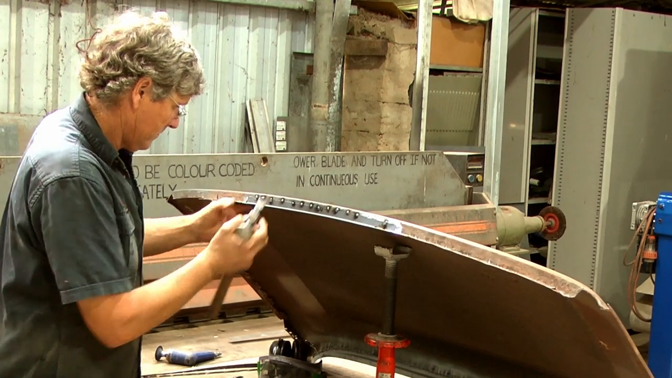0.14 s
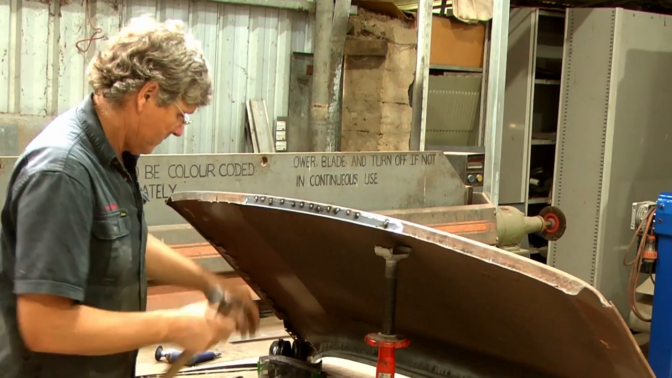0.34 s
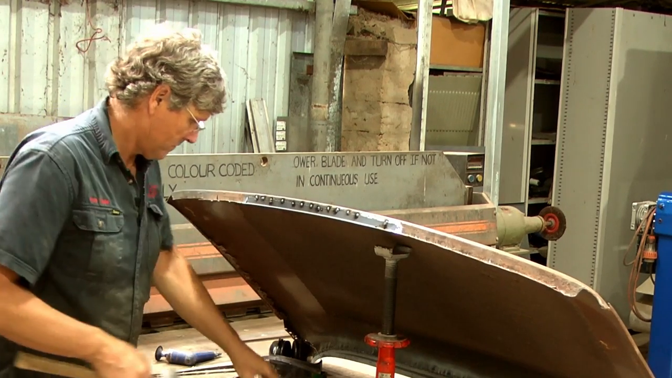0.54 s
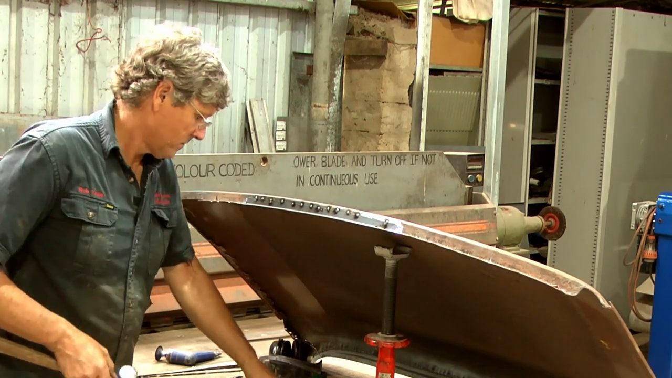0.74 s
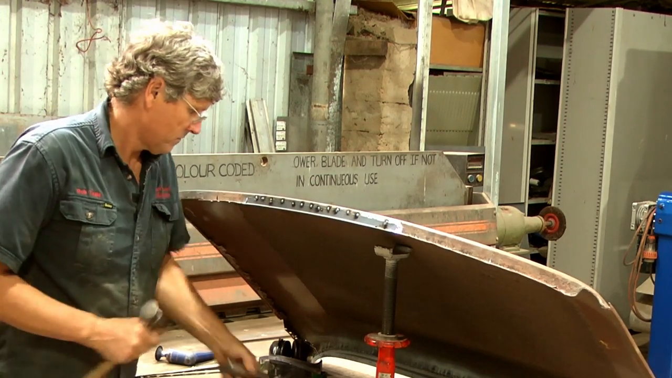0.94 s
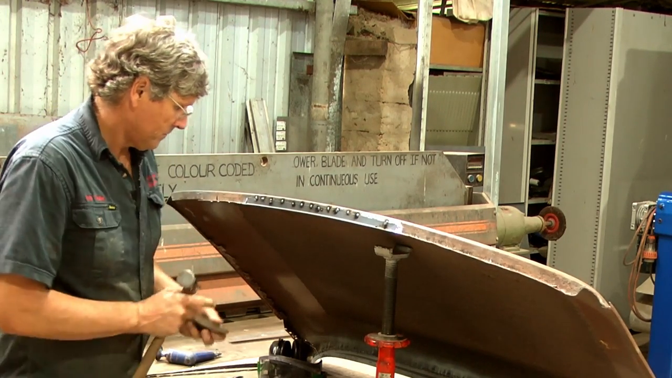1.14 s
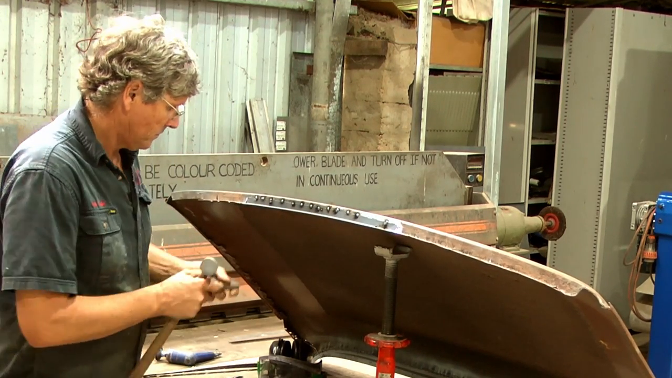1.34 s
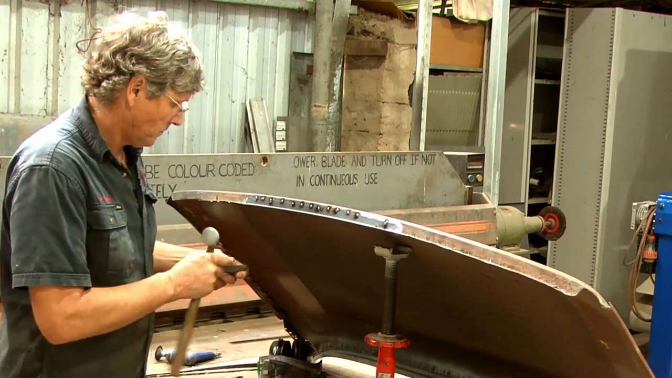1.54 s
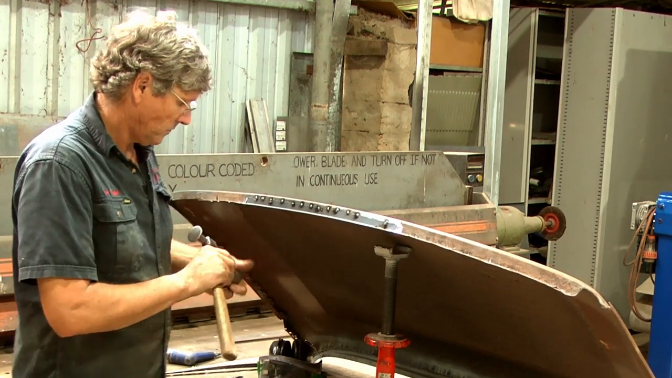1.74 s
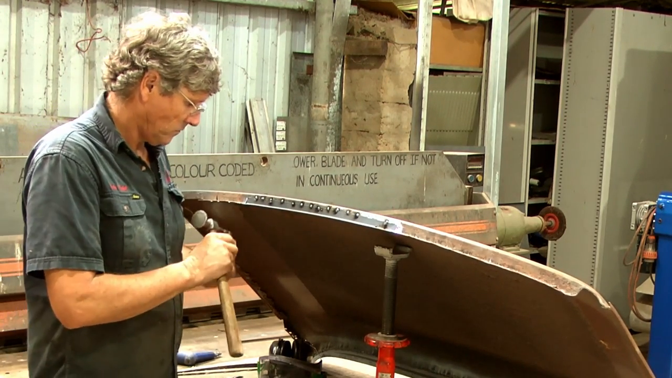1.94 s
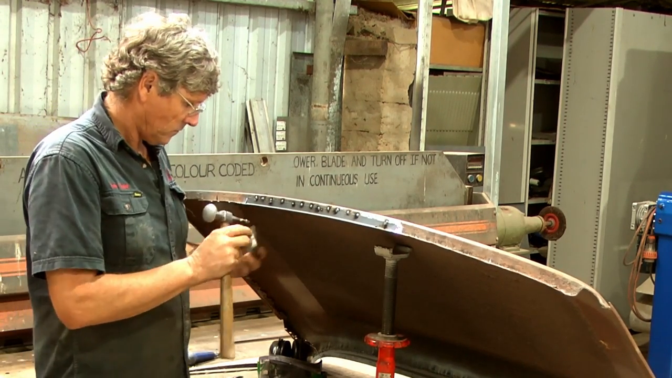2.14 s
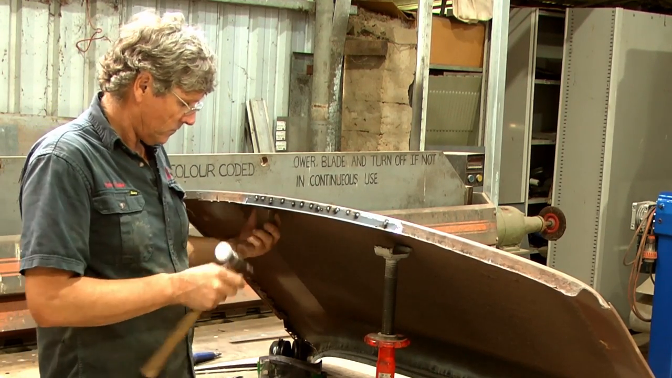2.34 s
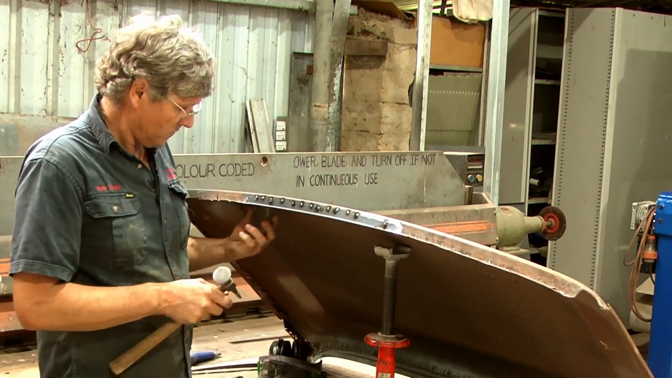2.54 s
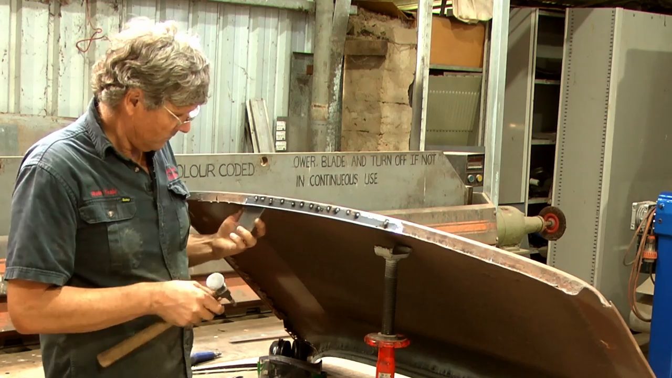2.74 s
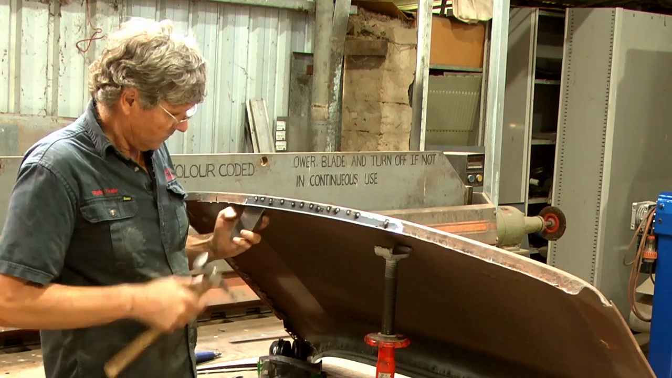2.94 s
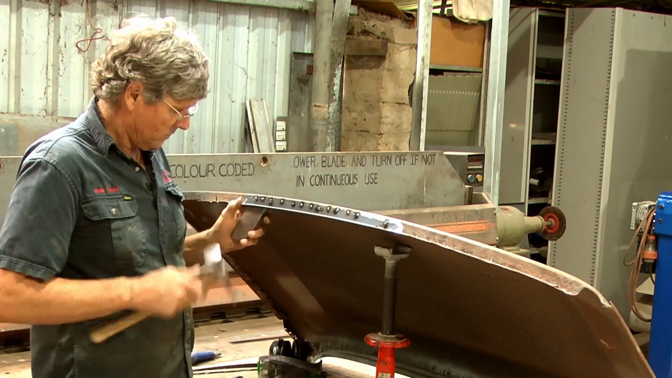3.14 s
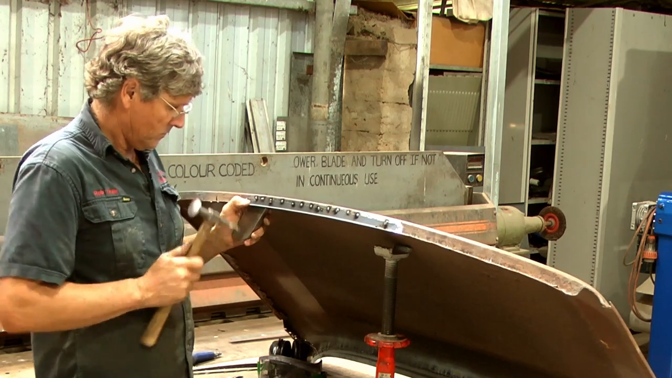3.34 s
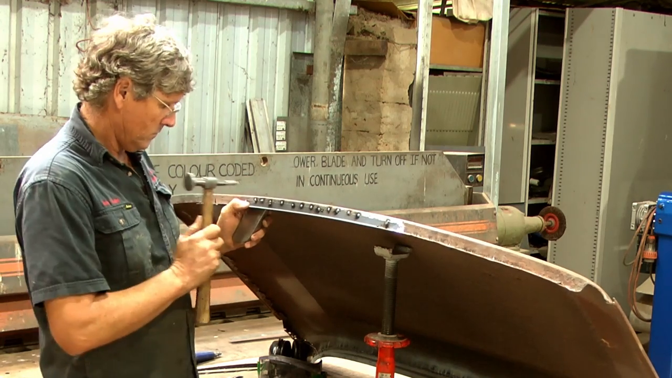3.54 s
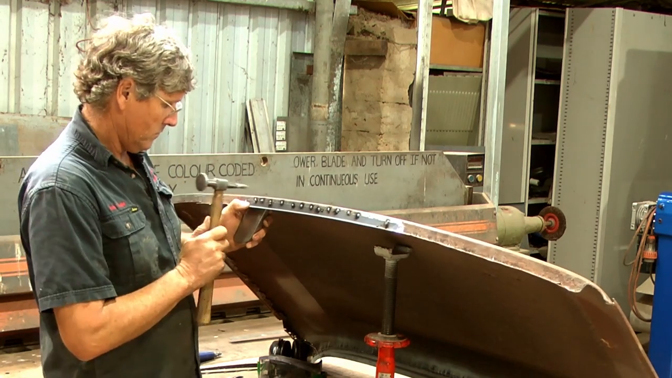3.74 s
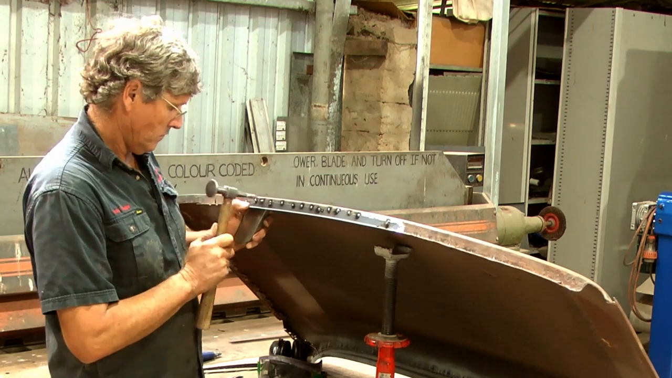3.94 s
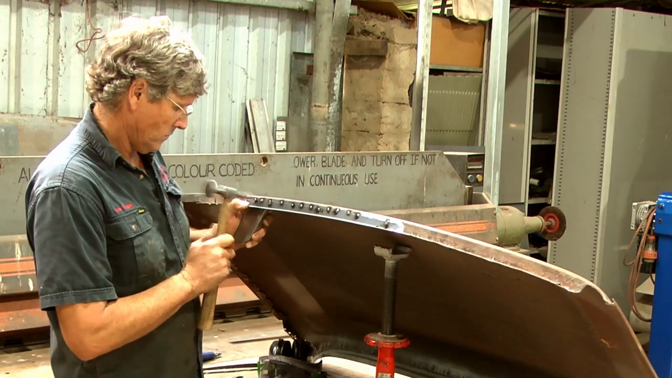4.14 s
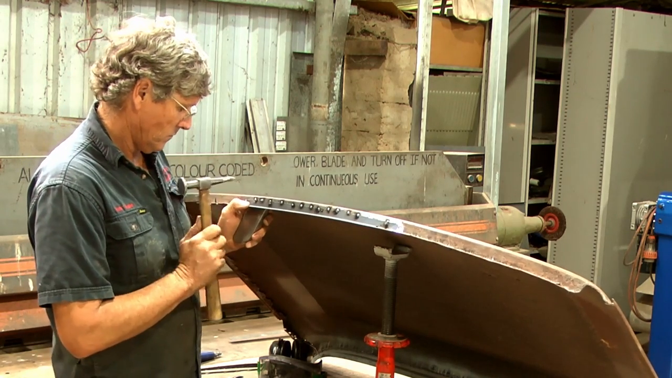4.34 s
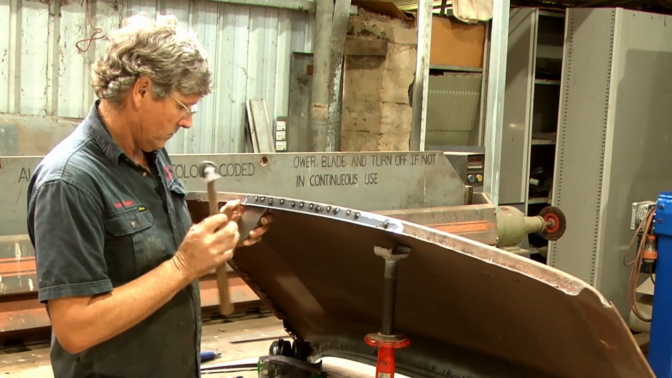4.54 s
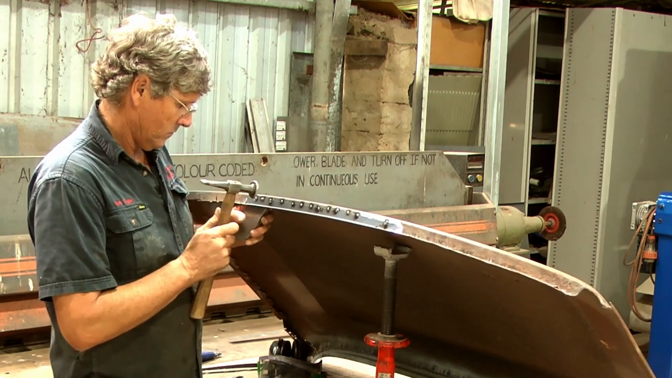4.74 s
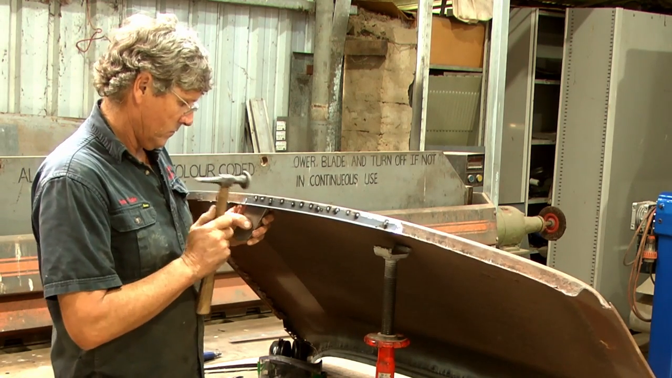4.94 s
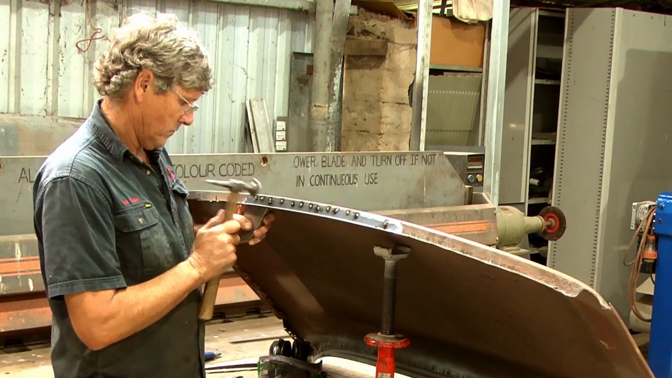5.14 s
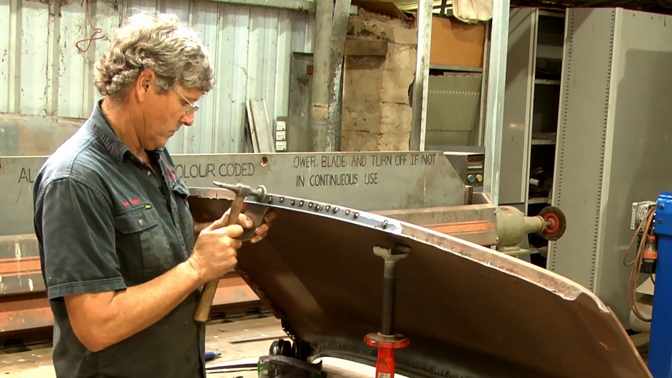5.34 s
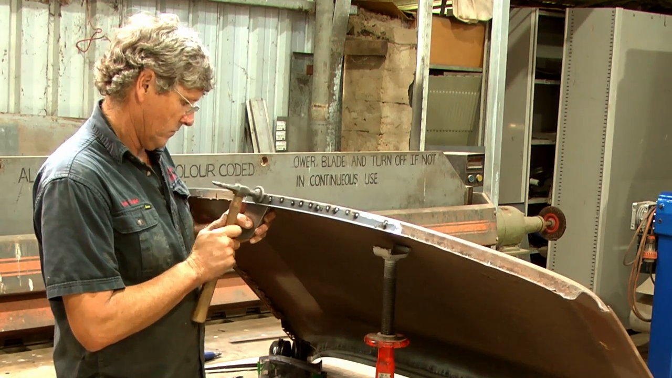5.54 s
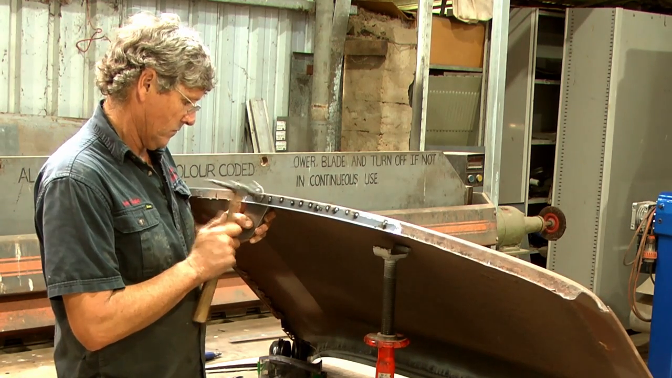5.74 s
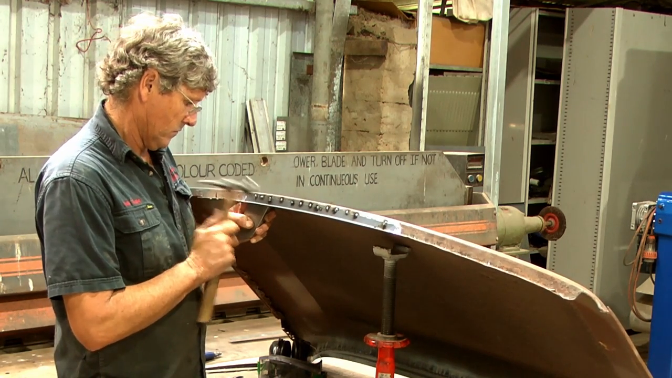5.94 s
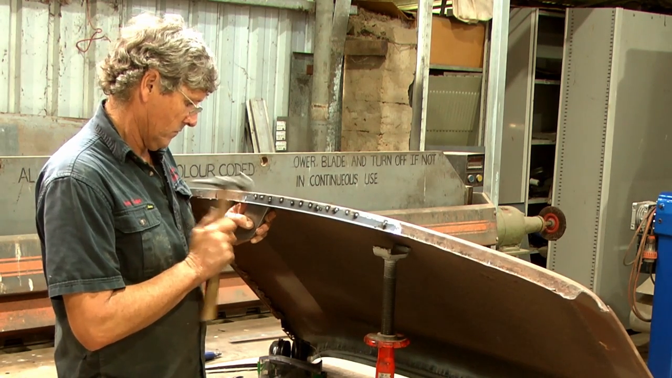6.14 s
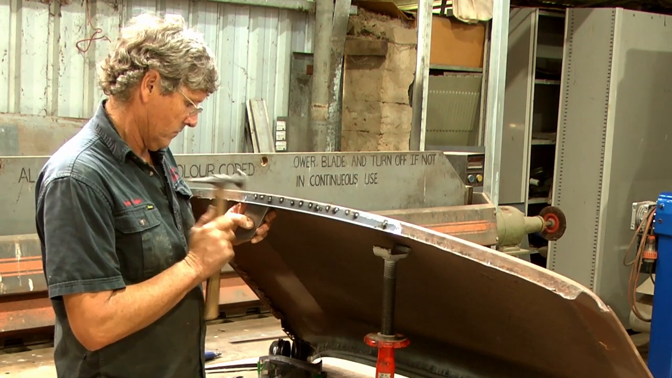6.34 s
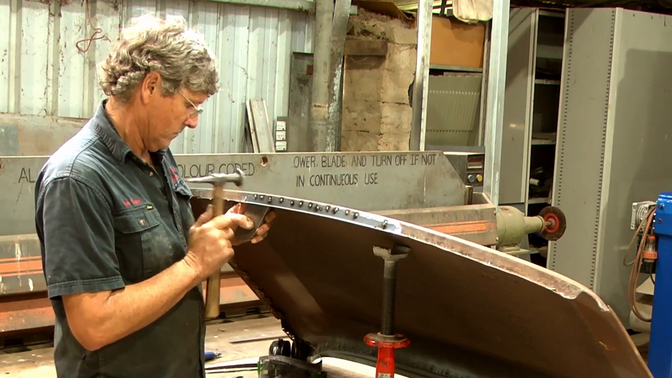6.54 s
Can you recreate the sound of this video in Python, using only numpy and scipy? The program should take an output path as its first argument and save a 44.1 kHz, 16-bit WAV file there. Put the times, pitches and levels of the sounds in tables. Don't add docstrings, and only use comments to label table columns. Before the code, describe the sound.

A distant machine hums faintly throughout, with wavering tones and thin whines beneath soft air noise in a tin-walled shed. From 0 to 2.3 s, hands and cloth rub grainily over tools, with soft low thuds around 0.3, 0.7 and 1.1 s and barely audible steel tinks. At 2.4 s a heavy steel block knocks hollowly on sheet steel, then catches and clatters brightly at 2.7 to 2.9 s. Rustling and a longer dragging rumble follow, ending around 3.3 s with a small squeak and bump. Hammering starts at 4.0 s with a dull, heavy blow, another at 4.2 s, then the ring fades. From 5.15 to 6.65 s eight hard blows come about every 0.2 s: sharp cracks, short damped clanging panel tones and shed reverberation. Brightness varies; the sixth overall is brightest, the last two ring at the hammer face. The close microphone overloads harshly.

```python
import sys
import numpy as np
from scipy import signal
from scipy.fft import rfft, irfft
from scipy.io import wavfile
from scipy.ndimage import uniform_filter1d

SR = 44100
rng = np.random.default_rng(int(sys.argv[2]) if len(sys.argv) > 2 else 0)


def waveform_to_disk(signal):
    frames = np.transpose(np.atleast_2d(signal))
    scaled = np.clip(frames, -1, 1) * 32767
    samples = np.round(scaled).astype(np.int16)
    wavfile.write(sys.argv[1], SR, samples)


def convert_level_to_amplitude(level_db):
    exponent = np.asarray(level_db, float) / 20
    return 10 ** exponent


N = 294926

# (frequency [Hz], level [dB])
PLATE_COLOUR = [(18, -61), (30, -77), (109, -3.5), (145, -9), (184, 4.5), (252, -6.5), (394, 0),
                (666, -5.5), (740, -4.5), (1130, -10.5), (3980, -31.5), (7090, -45), (16000, -72.5)]
# (frequency [Hz], time to fall 60 dB [s])
SHED_DECAY = [(60, 2.3), (200, 1.8), (500, 1.3), (750, 1.14), (1200, 1.07), (3000, 1.23), (8000, 0.83),
              (16000, 0.74)]


def read(points, hz, column=1):
    points = np.asarray(points, float)
    return np.interp(np.log(hz + 1), np.log(points[:, 0] + 1), points[:, column])


def evened(x):
    return x / np.sqrt(np.mean(x ** 2) + 1e-20)


def add(mix, s, sound):
    part = mix[round(s * SR):][:len(sound)]
    part += sound[:len(part)]


def coloured(x, points):
    hz = np.fft.rfftfreq(len(x), 1 / SR)
    return evened(irfft(rfft(x) * convert_level_to_amplitude(read(points, hz)), len(x)))


def narrow(hz, width):
    return evened(signal.lfilter(*signal.iirpeak(hz, hz / width, SR), rng.standard_normal(N)))


def level(rows, column):
    rows = np.asarray(rows, float)
    return convert_level_to_amplitude(np.interp(np.arange(N) / SR, rows[:, 0], rows[:, column]))


def wander(size):
    return evened(uniform_filter1d(uniform_filter1d(rng.standard_normal(N), size), size))


def rubs(rows):
    swing_db = 20
    out, t = np.zeros(N), np.arange(N) / SR
    for peak, rise, fall, db in rows:
        out += convert_level_to_amplitude(db - swing_db * np.maximum((peak - t) / rise, (t - peak) / fall))
    return uniform_filter1d(out, size=400)


def rings(modes, t, spread, chance):
    hz, db, t60 = np.repeat(modes, 2, axis=0).T[:, :, None]
    detune, share = rng.standard_normal((2, len(hz), 1))
    swell = 1 - np.exp(-hz * t / 1.9)
    fade = convert_level_to_amplitude(db + chance * share - 60 * t / t60)
    return (swell * fade * np.sin(2 * np.pi * hz * (1 + spread * detune) * t)).sum(0)


def dying(size, colour, t60, build):
    hz, at, z = signal.stft(coloured(rng.standard_normal(size), colour), SR, nperseg=256)
    swell = 1 - np.exp(-(hz[:, None] + 40) * (at + 0.0052) / build)
    rattle = evened(uniform_filter1d(rng.standard_normal(len(at)), size=2))
    swell = swell * convert_level_to_amplitude(np.outer(read([(1200, 0.09), (4000, 0.76)], hz), rattle))
    fade = convert_level_to_amplitude(-60 * at / read(t60, hz)[:, None])
    return signal.istft(z * swell * fade, SR, nperseg=256)[1][:size]


def tilted(points, bass_db, treble_db):
    hz, db = np.transpose(points)
    return np.c_[hz, db + read([(220, bass_db), (450, 0), (900, 0), (2500, treble_db)], hz)]


def still_air():
    # (frequency [Hz], level [dB])
    air_colour = [(12, -32.5), (20, -11.5), (169, -7.5), (313, 1), (360, 2.5), (414, -4), (614, -5.5),
                  (1310, -14.5), (1430, -18), (1550, -16.5), (1830, -16), (4260, -25), (6860, -36.5),
                  (15100, -46.5), (16400, -45.5)]
    middle, side = [coloured(rng.standard_normal(N), air_colour) * convert_level_to_amplitude(.8 * wander(size=4000)) for _ in range(2)]
    return convert_level_to_amplitude(-58) * (middle + convert_level_to_amplitude(-28.5) * side * np.c_[[1, -1]])


def machine():
    # (frequency [Hz], level [dB])
    hum_tones = [(291, -73.5), (360.5, -56), (463, -68.5), (619, -68.5), (718, -70), (861, -75),
                 (1078, -72.5), (1244, -77), (2514, -83.5), (3553, -99.5)]
    # (lower [Hz], upper [Hz])
    whine_hz = (1454, 1780)
    # (time [s], lower whine [dB], upper whine [dB])
    whine_levels = [(0, -80, -71), (1.1, -80, -76), (1.6, -79, -77), (1.8, -70, -77), (2.4, -73, -78),
                    (3.4, -68.5, -77), (4., -75, -77), (5.1, -67, -81.5), (6.7, -88.5, -75)]
    whine_width_hz = 3, 45
    out, t = np.zeros(N), np.arange(N) / SR
    for hz, db in hum_tones:
        loudness = convert_level_to_amplitude(db + 1.6 * wander(size=3000))
        out += loudness * np.sin(2 * np.pi * hz * t + .6 * wander(size=6000))
    for k, hz in enumerate(whine_hz):
        out += narrow(hz, whine_width_hz[k]) * level(whine_levels, column=k + 1)
    return out


def shed(x, side_db):
    taps = rng.choice([-1., 1.], (2, SR)) * (rng.random((2, SR)) < .06)
    taps[:, :500] = 0
    hz, at, z = signal.stft(taps, SR, nperseg=256)
    fade = convert_level_to_amplitude(-60 * at / read(SHED_DECAY, hz)[:, None])
    mid, side = signal.istft(z * fade, SR, nperseg=256)[1]
    pair = np.array([mid + convert_level_to_amplitude(side_db) * side, mid - convert_level_to_amplitude(side_db) * side]) / np.linalg.norm(mid)
    return signal.fftconvolve(x[None], pair, axes=1)[:, :N]


def thuds():
    # (time [s], level [dB], pitch [Hz], time to fall 60 dB [s])
    bumps = [(.262, -43.5, 60, 0.16), (0.311, -52, 190, 0.21), (0.686, -40.5, 155, 0.18),
             (.75, -46, 70, 0.26), (0.809, -49, 81, 0.38), (1.068, -53, 70, 0.19), (1.32, -67, 56, 0.23),
             (1.498, -51, 60, 0.11), (3.198, -48, 101, 0.65), (2.85, -45.5, 80, 0.46),
             (3.27, -55, 80.2, 0.18), (3.5, -55, 60, 0.38), (3.58, -55, 75, 0.36)]
    out, t = np.zeros(N), np.arange(SR // 2) / SR
    for s, db, hz, t60 in bumps:
        colour = [(hz / 3, -14), (hz, 0), (hz * 4.0, -10), (hz * 6, -45), (hz * 30, -90)]
        body = coloured(rng.standard_normal(len(t)), colour)
        add(out, s, convert_level_to_amplitude(db - 60 * t / t60) * (1 - np.exp(-t / 0.0064)) * body)
    return out


def hands():
    # (peak [s], rise [s], fall [s], rustle [dB], fizz above rustle [dB])
    hand_rubs = [(.02, .02, .08, -61, -18), (.27, 0.14, .19, -74, -15), (.44, .03, .12, -73, -27),
                 (.52, .14, .09, -61.5, -20), (.62, .05, .03, -66, -24), (.82, 0.074, .06, -54.5, -25),
                 (.97, .1, .3, -56.5, -14), (1.39, .1, .15, -63, -10), (1.63, 0.073, .12, -66, -11),
                 (1.7, .14, .23, -51, -18), (1.96, 0.18, .1, -66.5, -3), (2.12, 0.037, .06, -54, -21),
                 (2.53, 0.034, .07, -66, -18), (2.71, 0.078, .01, -47, -15), (2.96, .03, .3, -68, -27),
                 (3.06, .12, .1, -69, -4.5), (3.174, 0.24, .07, -55, -18), (3.32, 0.11, .03, -55, -14),
                 (3.345, 0.0085, .05, -52, -24), (3.41, .1, .22, -59.5, -14.5), (3.712, .14, .03, -69, -39),
                 (4.735, .03, .04, -63, -5), (4.85, 0.71, .4, -64.5, -17)]
    # (frequency [Hz], level [dB])
    rustle_colour = [(410, -32.5), (700, 4.5), (858, 1), (1090, -0.5), (1610, 4.5), (2800, -4.5),
                     (3430, 0.5), (8000, -13), (10400, -45.5), (17600, -120)]
    fizz_colour = [(5000, -18), (7000, -5.5), (11000, -7), (16500, -19.5)]
    grains = rng.standard_normal((2, N)) * convert_level_to_amplitude(3.2 * wander(size=90))
    rustle = coloured(grains[0], rustle_colour) * rubs([row[:4] for row in hand_rubs])
    fizz_rubs = [(*row[:3], row[3] + row[4]) for row in hand_rubs]
    fizz = coloured(grains[1], fizz_colour) * rubs(fizz_rubs)
    return convert_level_to_amplitude(-5.5) * rustle + convert_level_to_amplitude(-3) * fizz


def tinks():
    # (time [s], low tone [dB], high tone [dB])
    touches = [(.76, -95, -88), (.99, -80, -92), (1.1, -84, -95), (1.36, -84, -95), (1.72, -80, -88),
               (1.84, -82, -92), (1.95, -75, -88), (2.1, -85, -81), (2.2, -85, -88), (2.63, -76, -88),
               (2.717, -61, -66), (2.739, -66, -70), (2.839, -80, -68), (2.883, -70, -84), (3.06, -90, -80),
               (3.13, -90, -80)]
    # (frequency [Hz], time to fall 60 dB [s])
    block_tones = [(8200, .21), (10700, .16)]
    out, t = np.zeros(N), np.arange(SR // 4) / SR
    for s, *levels_db in touches:
        modes = [(hz, db, t60) for (hz, t60), db in zip(block_tones, levels_db)]
        add(out, s, rings(modes, t, spread=0.0045, chance=1.1))
    return out


def slide():
    # (peak [s], rise [s], fall [s], level [dB])
    drags = [
        (2.6, .01, 0.082, -50),
        (2.711, 0.062, 0.01, -25.5),
        (3.214, .24, 0.017, -34.5),
        (3.27, .1, 0.23, -50),
        (3.348, .007, 0.048, -41),
        (3.448, .02, .008, -58.5),
    ]
    # (peak [s], rise [s], fall [s], level [dB])
    squeaks = [(3.28, .05, .14, -60.5)]
    rumble = coloured(rng.standard_normal(N) * convert_level_to_amplitude(1.4 * wander(size=150)), PLATE_COLOUR)
    return convert_level_to_amplitude(-9) * rumble * rubs(drags) + convert_level_to_amplitude(-5.5) * narrow(3700, 50) * rubs(squeaks)


def panel(t, bass_db, treble_db, dense_db, ring_db):
    # (frequency [Hz], level [dB], time to fall 60 dB [s])
    strong_modes = np.array([(92.9, -30, 3.8), (119.3, -10.5, 1.1), (190, -14, 1.6), (289.3, -2.5, 0.61),
                             (385.5, -9, 0.38), (444.8, -4, 0.46), (518.4, 0, 0.19), (616, -9.5, 0.42),
                             (690, -4.5, 0.58), (737.4, -10.5, 0.58), (972, -10, 0.55), (1070, -25, 0.26),
                             (1419, -8.5, 0.16), (1616, -21.5, 1.4), (1894, -22.5, 0.18), (2220, -27, 0.61),
                             (2724, -23, 0.24), (3065, -27, 0.3), (3577, -33, .3), (4150, -33.5, 0.49),
                             (4630, -30, .2)])
    # (frequency [Hz], time to fall 60 dB [s])
    plate_decay = [(60, 0.52), (200, 0.87), (600, 0.18), (1500, 0.29), (4000, 0.046), (9000, .06),
                   (16000, .05)]
    dense = dying(len(t), tilted(PLATE_COLOUR, bass_db, treble_db), plate_decay, build=3.3)
    modes = np.c_[tilted(strong_modes[:, :2], bass_db, treble_db), strong_modes[:, 2]]
    return convert_level_to_amplitude(dense_db) * dense + convert_level_to_amplitude(ring_db) * rings(modes, t, spread=0.01154, chance=3.1)


def contact(t, crack_db, face_db, crack_t60):
    # (frequency [Hz], level [dB])
    crack_colour = [(180, -23), (300, -14), (486, -7.5), (737, 9.5), (2740, -8), (3640, -5.5), (4020, -6),
                    (6960, -16), (16000, -42)]
    # (frequency [Hz], level [dB], time to fall 60 dB [s])
    face_tones = [(4107, -2, 0.013), (3044, -5.5, 0.012)]
    crack = 0.96 * coloured(rng.standard_normal(len(t)), crack_colour) * convert_level_to_amplitude(-60 * t / crack_t60)
    return convert_level_to_amplitude(crack_db) * crack + convert_level_to_amplitude(face_db) * rings(face_tones, t, spread=0.024, chance=2.3)


def answer(t, bass_db, treble_db):
    # (frequency [Hz], level [dB])
    echo_colour = [(35, -47), (60, -26.5), (85, 2), (238, -13), (437, -4), (698, -3.5), (1200, -10.5),
                   (4250, -26.5), (4800, -29), (16000, -53)]
    colour = tilted(echo_colour, 0.91 * bass_db, 0.3 * treble_db)
    return dying(len(t), colour, SHED_DECAY, build=14.0) * (1 - np.exp(-t / 0.013))


def strikes(rows, size, dense_db, ring_db, damp_db, rise, crack_t60, echo_db, gain_db):
    t, out = np.arange(size) / SR, np.zeros(N)
    near = t[:size // 2]
    for s, strength_db, bass_db, treble_db, crack_db, face_db in rows:
        steel = panel(near, bass_db, treble_db, dense_db, ring_db) * convert_level_to_amplitude(-damp_db * near)
        steel += contact(near, crack_db, face_db, crack_t60)
        sound = convert_level_to_amplitude(echo_db) * answer(t, bass_db, treble_db)
        sound[:len(near)] += steel * (1 - np.exp(-near / rise)) * np.minimum((near[-1] - near) / .1, 1)
        sound *= np.minimum((t[-1] - t) / 0.14, 1)
        add(out, s + 0.00016, convert_level_to_amplitude(strength_db + gain_db) * sound)
    return out


def knocks():
    # (time [s], strength [dB], bass [dB], treble [dB], crack [dB])
    dolly_knocks = [(.803, -41.5, 16, 16, -17), (.826, -59, -9, 4, -8), (2.122, -58, -9, 33, -3),
                    (2.404, -16, 13, -1, -11), (2.409, -17, 2, 3, -15), (2.428, -21.5, 10.5, -32, -16),
                    (2.485, -21, 10.5, -23, -25), (2.557, -29.5, 8, -15, -9.5), (2.662, -53, 6, 8, -1),
                    (2.683, -44, 6, 1, 4), (2.716, -12, -5, 12.5, -2), (2.727, -26.5, -13, 28.5, 4),
                    (2.738, -18, 3, 3, 1), (2.756, -21, -19, -5, -9), (2.838, -21.5, 0, 2, -4.5),
                    (2.847, -26.5, -2, 12, -16), (2.882, -32, -2, -2, -4), (2.92, -39, 11, -4, -10),
                    (3.094, -35.5, -14, -2, -17), (3.346, -32, -8, -17, 0), (3.385, -41.5, 4, 19, -3),
                    (4.021, -23, -8, 20, -9), (5.02, -38, -10, 9, -1)]
    rows = [(*row, -12.5 + 0.82 * row[-1]) for row in dolly_knocks]
    return strikes(rows, size=SR // 2, dense_db=-3.5, ring_db=-14, damp_db=70.5, rise=0.00021,
                   crack_t60=0.036, echo_db=-22.5, gain_db=-7.5)


def blows():
    # (time [s], strength [dB], treble [dB], crack [dB], face ring [dB])
    hammer_blows = [
        (3.978, -6, -25.5, -3, -5.5),
        (4.222, -4, -9.5, -1, -8.5),
        (5.145, -5, 4.5, 8, -3),
        (5.379, -3.5, 4, 1, 5),
        (5.6, -3.5, 6, 6.5, -0.5),
        (5.822, -5, 11, 9, 9),
        (6.034, -3, -3, 2.5, 0.5),
        (6.243, -3.5, 10, 4.5, 5),
        (6.452, -4.5, 9, 7, 13),
        (6.664, -6.5, -1.5, 7.5, 13.5),
    ]
    rows = [(s, db, -9 + 0.21 * treble, treble, crack, face) for s, db, treble, crack, face in hammer_blows]
    return strikes(rows, size=SR, dense_db=-8.0, ring_db=-15.5, damp_db=28.5, rise=0.000085,
                   crack_t60=0.053, echo_db=-20.0, gain_db=5.5)


def scene():
    background = still_air() + machine()
    small = thuds() + hands() + tinks() + slide()
    steel = knocks() + blows()
    return background + convert_level_to_amplitude(-12.5) * shed(small, side_db=-24.0) + small + steel


def port(x, presence_hz, bass_hz, db):
    presence = signal.lfilter(*signal.iirpeak(presence_hz, 1.3, SR), x)
    bass_cut = signal.butter(2, bass_hz, "high", fs=SR)
    return convert_level_to_amplitude(db) * signal.lfilter(*bass_cut, x + 1.08 * presence)


def low_pass(x):
    return signal.sosfilt(signal.butter(12, 16530, fs=SR, output="sos"), x)


def record(dry):
    left, right = np.clip(dry, -.39, .39)
    toned = np.array([port(left, 4010, 60, -0.34), port(right, 4170, 51.5, 0.47)])
    treble_limit = signal.ellip(8, .3, 50, 15700, fs=SR, output="sos")
    toned = signal.sosfilt(treble_limit, np.clip(toned, -.9, .9))
    return low_pass(np.clip(toned, -1, 1))


dry = scene()
out = record(dry)
waveform_to_disk(out)
```